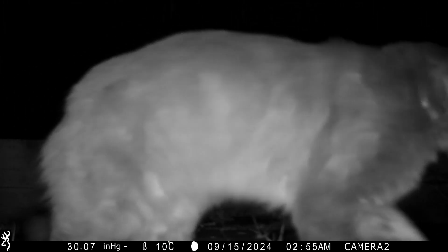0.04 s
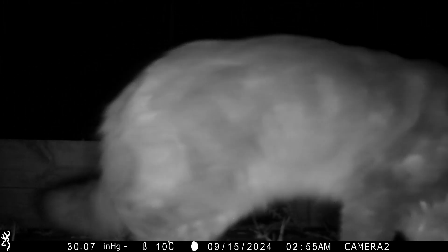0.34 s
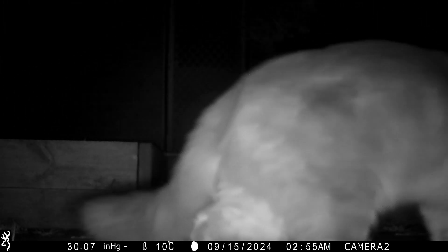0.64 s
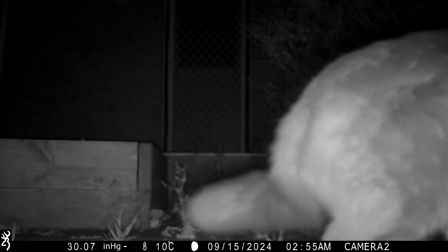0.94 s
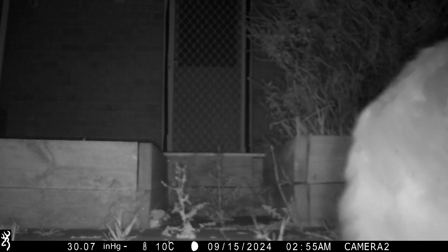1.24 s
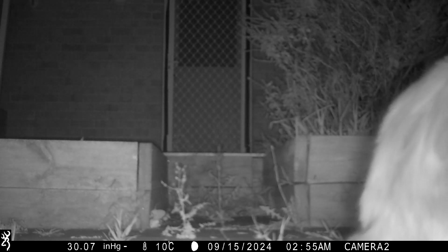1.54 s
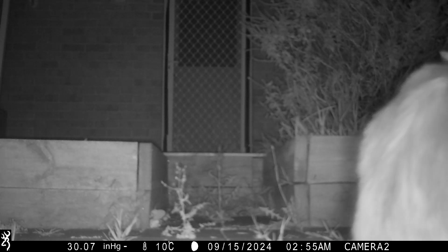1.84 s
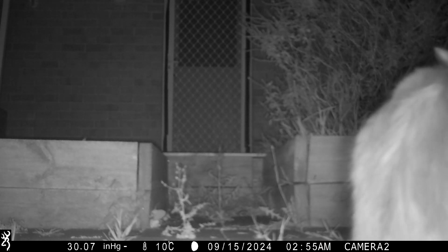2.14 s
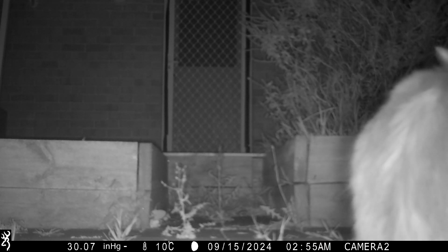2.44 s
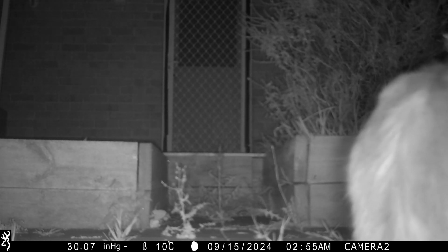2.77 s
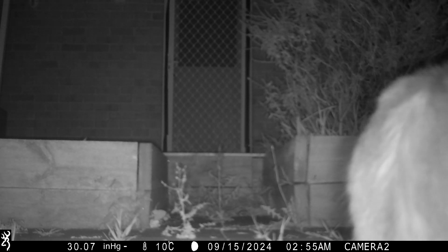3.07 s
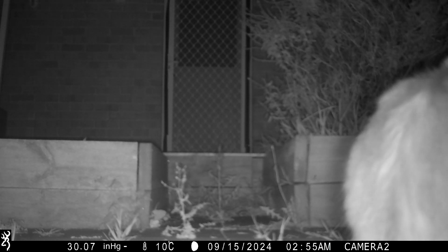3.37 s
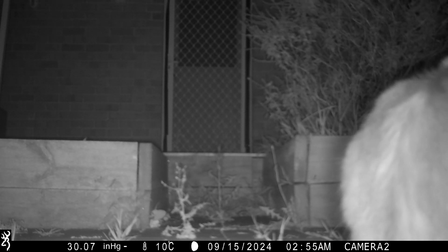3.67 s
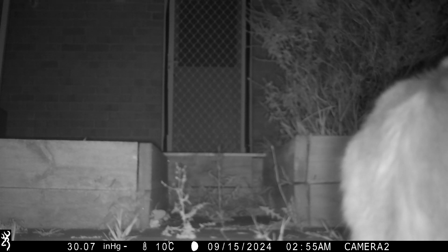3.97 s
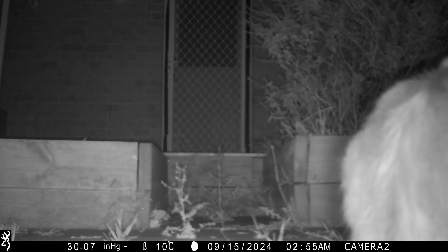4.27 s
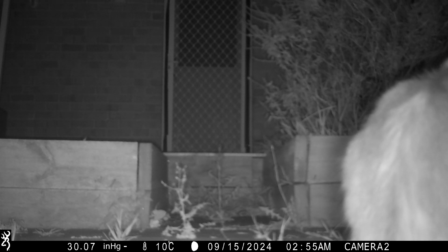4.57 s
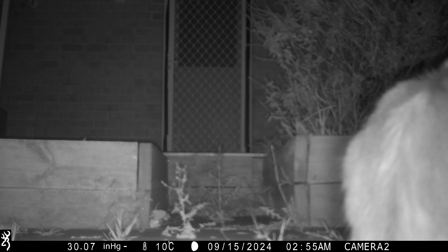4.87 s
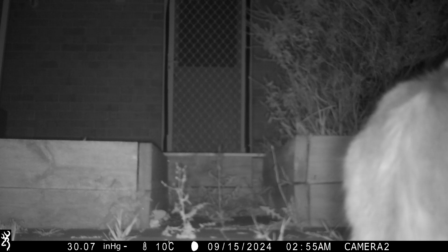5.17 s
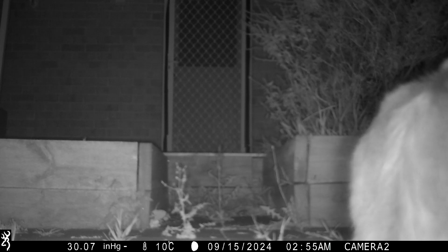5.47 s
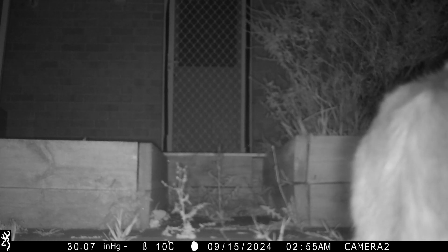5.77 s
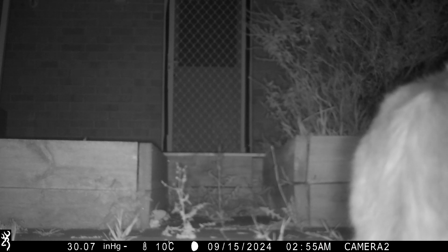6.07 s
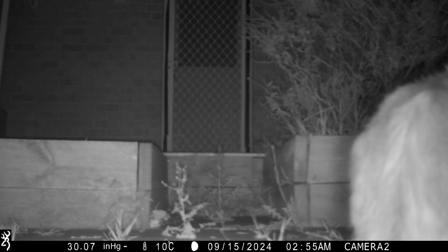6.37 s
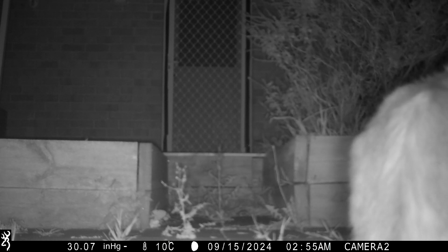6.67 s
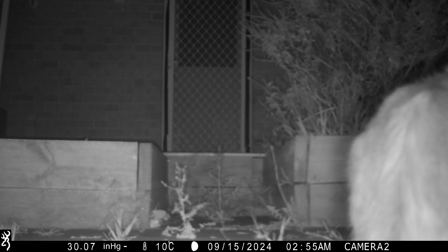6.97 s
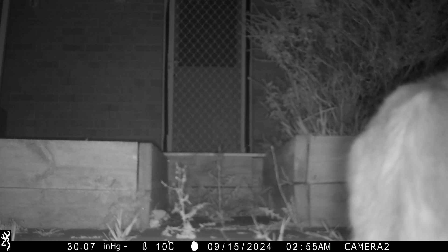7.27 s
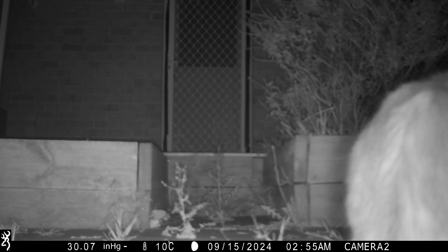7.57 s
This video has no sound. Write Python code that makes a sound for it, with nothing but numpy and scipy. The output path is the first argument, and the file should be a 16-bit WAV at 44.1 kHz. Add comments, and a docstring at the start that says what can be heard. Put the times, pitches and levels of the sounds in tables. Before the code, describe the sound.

Four drawn-out, slightly raspy cat yowls sound nearby, each breaking upward into a thin tail, with soft microphone hiss underneath.

```python
"""A trail camera hisses and whines faintly all through a night scene in a small backyard.
Right beside it a cat yowls four times: at once, then at about 1.5, 3.6 and 6.3 seconds.
Each yowl starts with a rasp, holds a wavering tone near 540 Hz, then breaks upward into a soft,
thin tail. The cat's vibrating vocal folds make the tone, and its mouth and throat shape it.
The ground, planters and walls answer each yowl with brief echoes."""
import sys
import numpy as np
from scipy import signal
from scipy.fft import rfft, irfft, next_fast_len
from scipy.io import wavfile

SR = 44100
rng = np.random.default_rng(int(sys.argv[2]) if len(sys.argv) > 2 else 0)


def master_out(mix):
    """Clip the mix to full scale and print it as 16-bit PCM to the path in sys.argv[1]."""
    frames = np.transpose(np.atleast_2d(mix))
    ceiling = np.clip(frames, -1, 1)
    pcm = np.round(ceiling * 32767).astype(np.int16)
    wavfile.write(sys.argv[1], SR, pcm)


N = 344421
TIME = np.arange(N) / SR
REST_DB, REST_MOUTH_HZ = -30, 1265   # level and mouth resonance of an ordinary held tone

# The held tone, one list per yowl. A resonance is a frequency that the mouth or throat boosts.
# Each row: time in seconds, pitch in Hz, level in dB, mouth resonance in Hz, throat resonance in Hz.
HELD_TONES = [
    [(0.0, 555, -24, 1117, 2350), (0.031, 539, -30.5, 1196, 2410), (0.047, 554, -28, 1185, 2570),
     (0.119, 573.7, -19.5, 1186, 2570), (0.174, 592.5, -23, 1308, 2420), (0.263, 599, -21, 1370, 2146),
     (0.351, 583, -15, 1252, 2160), (0.401, 565.6, -23.4, 1300, 2035), (0.458, 541, -18, 1196, 1900),
     (0.514, 529.5, -24.5, 1278, 1830), (0.605, 533.6, -25, 1011, 2400)],
    [(1.47, 483, -41.5, 960, 2570), (1.568, 561, -34, 1210, 2173), (1.649, 573.6, -32, 1225, 2230),
     (1.751, 561, -34, 1373, 2100), (1.81, 574.4, -30, 1220, 2267), (1.933, 571.4, -28, 1187, 2300),
     (1.977, 563.6, -30.0, 1330, 2084), (2.052, 528.6, -27, 1129, 2017), (2.128, 524.3, -21.5, 1046, 2300),
     (2.203, 537, -34.2, 1154, 2232), (2.37, 563, -29, 1175, 2394), (2.426, 556, -30.5, 1100, 2370)],
    [(3.585, 544, -38.3, 1197, 2110), (3.635, 547.4, -37.5, 1330, 2120), (3.69, 533, -36.5, 1410, 2074),
     (3.759, 550.5, -33.5, 1433, 2163), (3.885, 530.5, -31.5, 1500, 2360),
     (3.929, 538.2, -31.5, 1500, 2230), (4.091, 539.3, -30, 1432, 2174), (4.204, 528, -34.5, 1345, 2190),
     (4.29, 522.8, -28, 1155, 2570), (4.365, 558, -32, 1277, 2620), (4.468, 547.8, -31, 1467, 2325),
     (4.585, 556.2, -28, 1374, 2093), (4.769, 526.8, -24.5, 1229, 1956), (4.888, 521, -25, 1173, 2096),
     (4.975, 506.7, -25.5, 1188, 1800), (5.092, 509.4, -22.5, 1116, 1770), (5.172, 483, -27, 1040, 1984)],
    [(6.265, 566, -35, 1092, 2500), (6.354, 523.3, -38.5, 1350, 2310), (6.451, 497, -30.5, 1412, 2196),
     (6.595, 527.6, -31, 1403, 2324), (6.779, 515.7, -29.5, 1400, 2314), (6.907, 513, -32.5, 1344, 2353),
     (6.918, 524, -32, 1256, 2380), (6.983, 507, -28, 1064, 2483), (7.069, 535.4, -30.5, 1205, 2550),
     (7.135, 542.7, -30.5, 1300, 2470), (7.18, 539.6, -31.5, 1393, 2037), (7.322, 530, -28.0, 1315, 2190),
     (7.387, 511, -23.5, 1077, 2050), (7.44, 494, -31, 1036, 2350)],
]
# The thin tail, one list per yowl. Harmonics are multiples of the pitch; the first is the fundamental.
# Each row: time in seconds, pitch in Hz, fundamental in dB, level of the harmonics just above it in dB.
THIN_TAILS = [
    [(0.615, 627, -41.5, -31.5), (0.651, 643, -42, -33), (0.723, 669.3, -32.5, -36.5),
     (0.775, 653, -31, -44.5), (0.789, 637, -29.5, -50), (0.813, 648.7, -29.5, -48),
     (0.87, 631.6, -46, -64)],
    [(2.436, 647, -48.5, -39.5), (2.464, 657, -45, -39), (2.596, 695, -47, -39), (2.634, 679, -44, -44.5),
     (2.676, 687, -44, -45), (2.764, 659, -47, -50), (2.79, 628, -57, -56)],
    [(5.182, 555, -44, -37), (5.214, 580, -45.5, -40), (5.27, 593.4, -37.5, -46), (5.302, 583, -40, -64),
     (5.352, 610, -44.5, -59), (5.39, 687, -46, -67), (5.425, 640, -56, -71)],
    [(7.45, 590, -46, -36.5), (7.466, 593, -45, -43), (7.506, 613, -48, -40.5), (7.56, 625, -52.5, -55.5)],
]
# What sets each yowl apart. Each row: resting level of the fundamental in dB,
# stretch factor of the high resonances, flicker of the harmonics in dB.
YOWL_TRAITS = [(-50, 0.947, 2), (-50.5, 1.03, 4), (-50.5, 0.97, 1), (-47.5, 0.996, 1.0)]


def from_db(db):
    """Turn decibels into a gain to multiply by."""
    return 10 ** (np.asarray(db) / 20)


def rms_one(x):
    """Scale a signal to an average power of 1."""
    return x / np.sqrt(np.mean(x ** 2) + 1e-20)


def in_time(rows, t):
    """Read each column of a table at the times t, gliding from row to row."""
    seconds, *columns = np.transpose(rows)
    return [np.interp(t, seconds, column) for column in columns]


def at_hz(points, hz):
    """Read a table of frequencies and decibels as gains at hz."""
    known_hz, db = np.transpose(points)
    return from_db(np.interp(np.log(np.maximum(hz, 1)), np.log(known_hz), db))


def gate(t, start, end, fade_s):
    """A gain of 1 from start to end, with a short fade outside."""
    return np.clip(1 + np.minimum(t - start, end - t) / fade_s, 0, 1)


def bump(x, centre, half_width):
    """A bell-shaped curve that reaches 1 at its centre."""
    return np.exp(-np.minimum(((x - centre) / half_width) ** 2, 20))


def flutter(rate_hz, size):
    """A random wobble of typical size 1, mostly slower than rate_hz."""
    padded = next_fast_len(size)
    hz = np.fft.rfftfreq(padded, 1 / SR)
    white = rfft(rng.standard_normal(padded + 2))[:len(hz)]
    return rms_one(irfft(white / (1 + (hz / rate_hz) ** 2) ** 2, padded)[:size])


def hiss(level_db=-55.5, white_db=-84):
    """Steady microphone noise, strongest in the midrange, over a trace of white noise."""
    # The colour of the hiss. Each row: frequency in Hz, relative level in dB.
    spectrum = [(10, -29), (25, -16.5), (50, -14.5), (100, -10.5), (200, -5), (400, -2), (900, -1),
                (1500, -2.5), (2800, -10.5), (4200, -19.5), (5400, -23.5), (6000, -32.5), (7000, -35.5),
                (9000, -61)]
    size = next_fast_len(N, True)
    gains = at_hz(spectrum, np.fft.rfftfreq(size, 1 / SR))
    shaped = irfft(rfft(rng.standard_normal(size)) * gains, size)[:N]
    return from_db(level_db) * rms_one(shaped) + from_db(white_db) * rng.standard_normal(N)


def whine(pitch_hz=7797, flips_per_s=59.4, flipping_db=-71, steady_db=-80, octave_db=-92):
    """The camera's thin electronic tone keeps flipping its sign, which makes it buzz."""
    phase = 2 * np.pi * pitch_hz * TIME
    flips = np.sign(np.sin(np.pi * flips_per_s * TIME))
    buzz = (from_db(flipping_db) * flips + from_db(steady_db)) * np.sin(phase)
    return buzz + from_db(octave_db) * np.sin(2 * phase)


def yard(sound, decay_s=.25, reverb_db=-15.5, cutoff_hz=7900):
    """The yard sends back a few distinct echoes and a short, dull wash of sound."""
    # Bounces off the ground, planters and wall. Each row: delay in seconds, level in dB.
    echoes = [(0.013, -30.5), (0.0242, -21), (0.0316, -15)]
    t = TIME[:SR // 2]
    reverb = rng.standard_normal(len(t)) * from_db(-60 * t / decay_s)
    response = from_db(reverb_db) * reverb / np.sqrt(np.sum(reverb ** 2))
    for delay, db in echoes:
        response[round(delay * SR)] += from_db(db)
    response = signal.sosfilt(signal.butter(2, cutoff_hz, fs=SR, output="sos"), response)
    return signal.fftconvolve(sound, response)[:N]


def voice_controls(t):
    """The cat's pitch, level, mouth and throat resonances, brightening and fundamental level over time."""
    # The jaw stays set through each tail.
    # Each row: mouth resonance in Hz, throat resonance in Hz, brightening in dB per octave.
    tail_shapes = [(780, 2084, 7.5), (1199, 2375, 4), (850, 1920, 9), (965, 2280, 6)]
    rows = []
    for hold, tail, shape, (resting_db, *_) in zip(HELD_TONES, THIN_TAILS, tail_shapes, YOWL_TRAITS):
        for s, pitch, db, mouth_hz, throat_hz in hold:
            # more effort and a more open mouth both let out more of the fundamental
            lift_db = 0.45 * (db - REST_DB) + 0.007 * (mouth_hz - REST_MOUTH_HZ)
            rows.append((s, pitch, db, mouth_hz, throat_hz, 0, resting_db + lift_db))
        rows += [(s, pitch, db, *shape, fundamental_db) for s, pitch, fundamental_db, db in tail]
    return in_time(rows, t)


def hoarseness(t, calm_roughness=.08):
    """How rough the vocal folds are, from 0 to 1, and the gain of the rasp that comes with it."""
    # Hoarse moments. Each row: middle in seconds, half length in seconds, added roughness, rasp in dB.
    patches = [(.05, 0.094, 0.26, -45.5), (.33, 0.13, 0, -53), (1.51, .06, .55, -58.5),
               (2.26, 0.024, 0.39, -65), (3.59, 0.048, 0.92, -49), (3.70, 0.07, 0.68, -53.5),
               (4.02, 0.19, 0.06, -52.5), (4.28, 0.11, 0.48, -53.5), (6.245, 0.017, .3, -54.5),
               (6.285, 0.037, 0.77, -45.5), (6.46, 0.033, 0.36, -52.5), (6.78, 0.16, 0.09, -52.5),
               (6.99, 0.15, 0.43, -60.5)]
    breaks = [(tail[0][0], .022, .45, -57.5) for tail in THIN_TAILS]   # each upward break is hoarse too
    rough, rasp_gain = calm_roughness, 0
    for s, half_s, roughness, db in [*patches, *breaks]:
        patch = bump(t, s, half_s)
        rough += roughness * patch
        rasp_gain += from_db(db) * patch
    return np.clip(rough, 0, 1), rasp_gain


def sputter(lean=0.57):
    """The gain of a throat that opens and shuts in quick bursts; lean makes the dips outweigh the peaks."""
    # Catches in the voice. Each row: middle in seconds, half length in seconds,
    # bursts per second, swing in dB.
    catches = [(0.143, 0.052, 43, 0.5), (1.516, .04, 62, 4), (2.024, .025, 25, 2), (2.266, 0.036, 41, 3),
               (3.595, .02, 48, 4), (4.317, 0.018, 50, 3.5), (6.276, 0.027, 50, 8.5), (7, .05, 58, 0)]
    return from_db(sum(swing_db * bump(TIME, s, half_s) * (np.cos(2 * np.pi * rate * (TIME - s)) - lean)
                       for s, half_s, rate, swing_db in catches))


def resonant_noise(hz, width_hz):
    """Noise ringing around a frequency that may move."""
    phase = 2 * np.pi * np.cumsum(hz * np.ones(N)) / SR
    return flutter(width_hz, N) * np.cos(phase) + flutter(width_hz, N) * np.sin(phase)


def rasp(spans, resting_db=-62.5):
    """The noisy part of the voice rings in mouth and throat, and grows with effort and an open jaw."""
    # Throat resonances that stay put. Each row: frequency in Hz, width in Hz, relative level in dB.
    resonances = [(2280, 520, -6), (4300, 900, -27)]
    _, level_db, mouth_hz, *_ = voice_controls(TIME)
    _, hoarse_gain = hoarseness(TIME)
    steady_db = resting_db + 0.38 * (level_db - REST_DB) + 0.0188 * (mouth_hz - REST_MOUTH_HZ)
    steady_gain = from_db(steady_db) * sum(gate(TIME, *span, fade_s=.06) for span in spans)
    throat = sum(from_db(db) * resonant_noise(hz, width) for hz, width, db in resonances)
    mouth = resonant_noise(mouth_hz, width_hz=260)
    return np.hypot(steady_gain, hoarse_gain) * (mouth + throat)


def low_harmonics(t, hz, mouth_hz, throat_hz, brighten_db, mouth_width_hz=100, throat_width_hz=114):
    """Gains of the low harmonics, which swell as the mouth and throat resonances pass over them."""
    # the folds part for an instant as the voice breaks, which widens the resonances
    breaks = [(hold[-1][0] + tail[0][0]) / 2 for hold, tail in zip(HELD_TONES, THIN_TAILS)]
    widening = 1 + 2 * sum(bump(t, s, .006) for s in breaks)
    # a hollow in the tone, at about 2.3-3.4 kHz, softens the harmonics passing through it
    hollow_db = -6.5 * bump(hz, 1.283 * throat_hz, 393)
    tilt_db = (brighten_db - 4.5) * np.log2(hz / hz[0])   # the folds alone lose 4.5 dB per octave
    gain = from_db(tilt_db + hollow_db)
    for centre, width in ((mouth_hz, mouth_width_hz), (throat_hz, throat_width_hz)):
        gain = gain / np.hypot(1 - (hz / centre) ** 2, hz * width * widening / centre ** 2)
    return gain / np.sqrt(np.sum(gain ** 2, axis=0))


def high_harmonics(hz, mouth_hz, stretch, shut_mouth_hz=1120, jaw_pull=0.43):
    """Gains of the high harmonics, which slide under resonances that rise as the jaw opens."""
    # The high resonances with the mouth at rest. Each row: frequency in Hz, relative level in dB.
    spectrum = [(3050, -2), (3550, -7.5), (4150, 0), (4600, 1.5), (5150, -15.5), (5600, -16), (6050, -16.5),
                (6500, -25), (8000, -40.5)]
    shift = stretch * (np.maximum(mouth_hz, shut_mouth_hz) / REST_MOUTH_HZ) ** jaw_pull
    gain = at_hz(spectrum, hz / shift)
    return gain / np.sqrt(np.sum(gain ** 2, axis=0))


def fold_phase(t, pitch, rough):
    """Where the folds are in their cycle: the pitch wavers, jitters when rough and sometimes cracks."""
    # Brief flicks of pitch. Each row: middle in seconds, half length in seconds, share of the pitch.
    cracks = [(0.065, 0.0057, 0.083), (3.708, 0.0069, -0.056), (3.887, 0.011, -0.028),
              (4.306, 0.0055, -.03), (6.465, 0.0043, -0.017)]
    waver = .003 * flutter(30, len(t))
    jitter = rough * (.012 * flutter(70, len(t)) + 0.022 * flutter(180, len(t)))
    flicks = sum(share * bump(t, s, half_s) for s, half_s, share in cracks)
    return 2 * np.pi * np.cumsum(pitch * (1 + waver + jitter + flicks)) / SR


def yowl(start, end, treble, stretch, flicker_db, treble_trim_db=-1.74, smear=.7, fade_s=.012):
    """One call: 14 harmonics from vocal folds whose timing and strength shake when the voice is rough."""
    sounding = (TIME > start - fade_s) & (TIME < end + fade_s)
    t = TIME[sounding]
    pitch, level_db, mouth_hz, throat_hz, brighten_db, fundamental_db = voice_controls(t)
    treble_db, = in_time(treble, t)
    rough, _ = hoarseness(t)
    phase = fold_phase(t, pitch, rough)
    low_hz, high_hz = np.outer(range(2, 6), pitch), np.outer(range(6, 15), pitch)
    low = from_db(level_db) * low_harmonics(t, low_hz, mouth_hz, throat_hz, brighten_db)
    high = from_db(treble_db + treble_trim_db) * high_harmonics(high_hz, mouth_hz, stretch)
    tone = 0
    for k, gain in enumerate([from_db(fundamental_db), *low, *high], 1):
        uneven_db = 0.2779 * k * flutter(60, len(t))   # the folds close a little differently each time
        # a harmonic on a resonance holds steady; the weaker ones quiver
        weakness = np.clip(1 - gain / from_db(level_db), 0, 1)
        quiver_db = flicker_db * weakness * min(k / 5, 1) * flutter(45, len(t))
        wave = np.sqrt(2) * np.cos(k * phase - smear * k ** 2)   # the throat smears each pulse in time
        tone += gain * from_db(uneven_db + quiver_db) * wave
    # rough folds alternate strong and weak pulses, which adds tones between the harmonics
    tone *= 1 + 0.087 * rough * flutter(70, len(t)) * np.cos(phase / 2)
    shudder_db = 2 * rough * flutter(60, len(t))
    call = np.zeros(N)
    call[sounding] = tone * from_db(shudder_db) * gate(t, start, end, fade_s)
    return call


def cat():
    """Four yowls and their rasp, sputtering where the voice catches."""
    # The high harmonics, one list per yowl. Each row: time in seconds, level in dB before the trim.
    trebles = [
        [(0.01, -59), (0.196, -60), (0.27, -55), (0.686, -60.5), (0.728, -72), (0.842, -70), (0.846, -84),
         (0.87, -73)],
        [(1.47, -81), (1.528, -64.5), (1.65, -74.5), (1.958, -68), (2.274, -76.5), (2.444, -65), (2.756, -67.5),
         (2.79, -75)],
        [(3.585, -74), (4.133, -59), (4.215, -65.5), (4.399, -57), (5.111, -64), (5.127, -53), (5.389, -83),
         (5.425, -77)],
        [(6.265, -85), (6.333, -61), (6.347, -69), (6.631, -59.5), (6.873, -62), (7.093, -54), (7.497, -64),
         (7.56, -80)],
    ]
    spans = [(hold[0][0], tail[-1][0]) for hold, tail in zip(HELD_TONES, THIN_TAILS)]
    voice = sum(yowl(*span, treble, stretch, flicker_db)
                for span, treble, (_, stretch, flicker_db) in zip(spans, trebles, YOWL_TRAITS))
    return (voice + rasp(spans)) * sputter()


def scene():
    """The cat and its echoes over the noise of the camera, in one channel."""
    calls = cat()
    return (calls + yard(calls) + hiss() + whine())[None]


def record(dry):
    """Cut away the highest treble steeply."""
    cutoff_hz = 15700
    return signal.sosfilt(signal.ellip(10, .1, 80, cutoff_hz, fs=SR, output="sos"), dry)


dry = scene()
out = record(dry)
master_out(out)
```